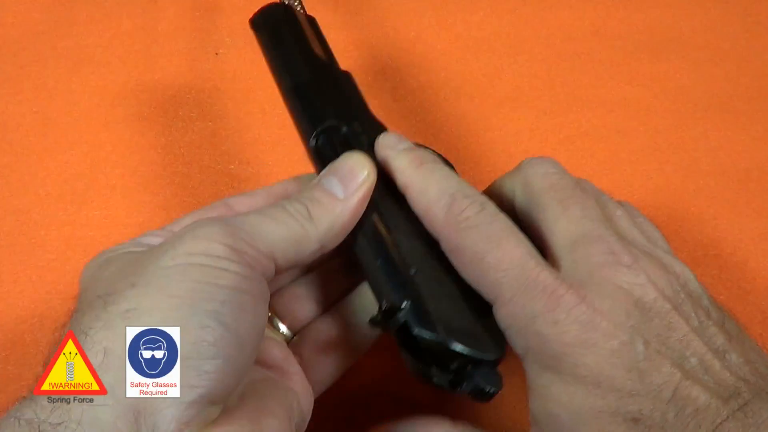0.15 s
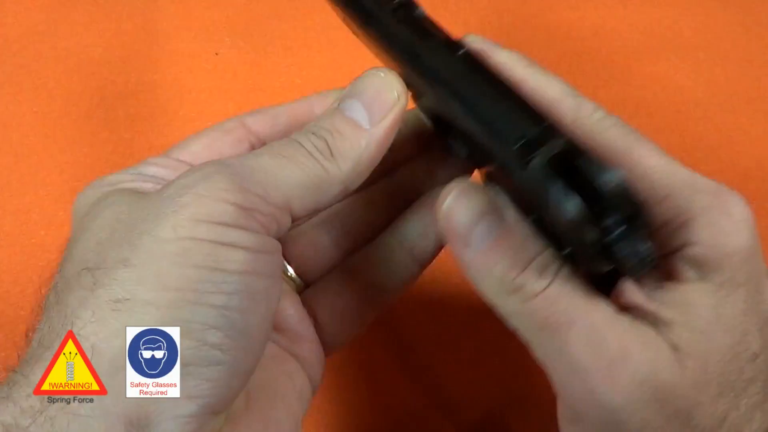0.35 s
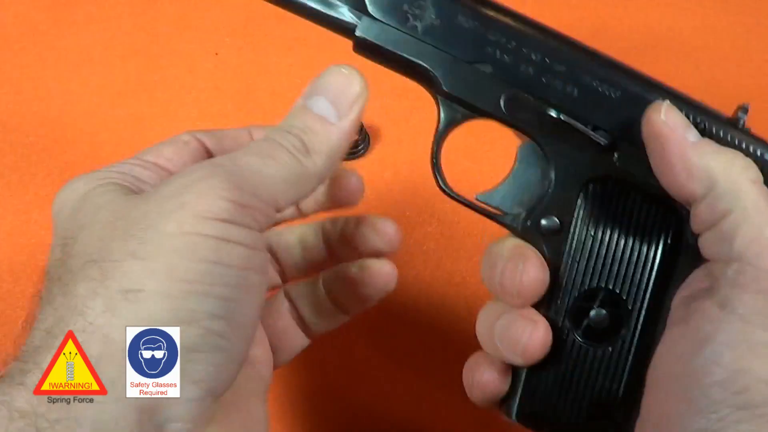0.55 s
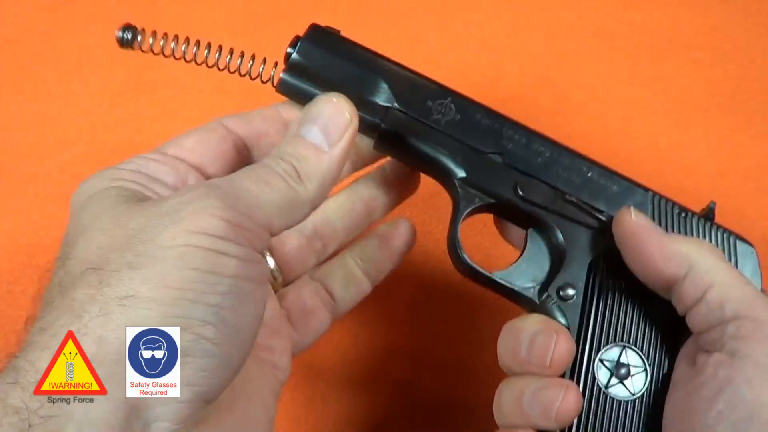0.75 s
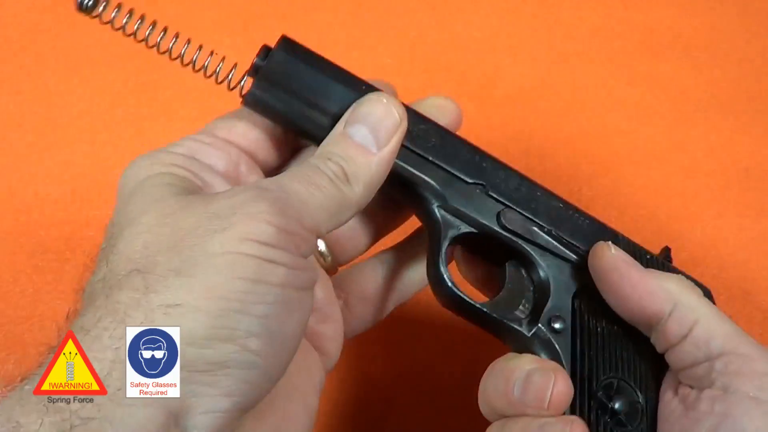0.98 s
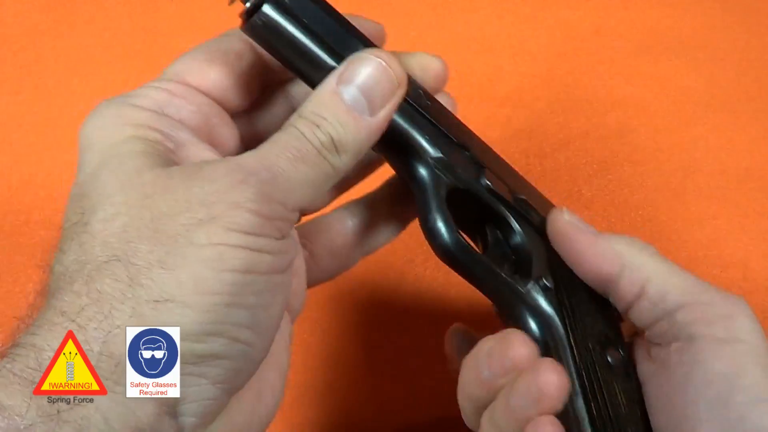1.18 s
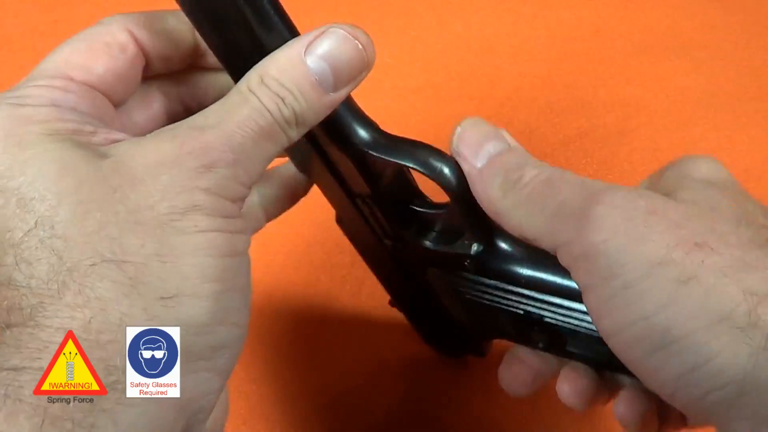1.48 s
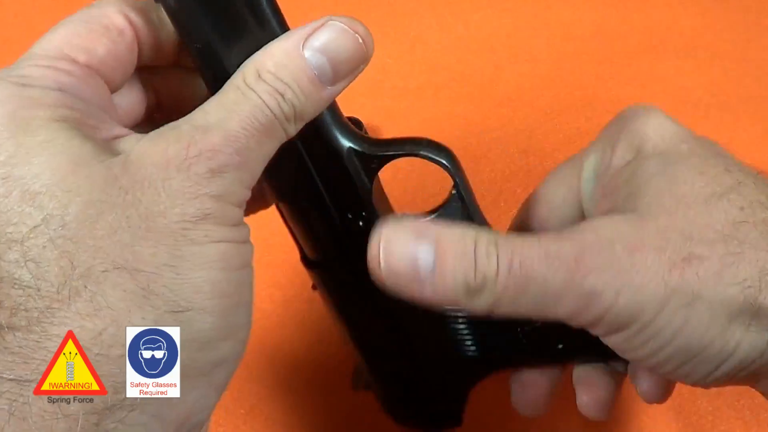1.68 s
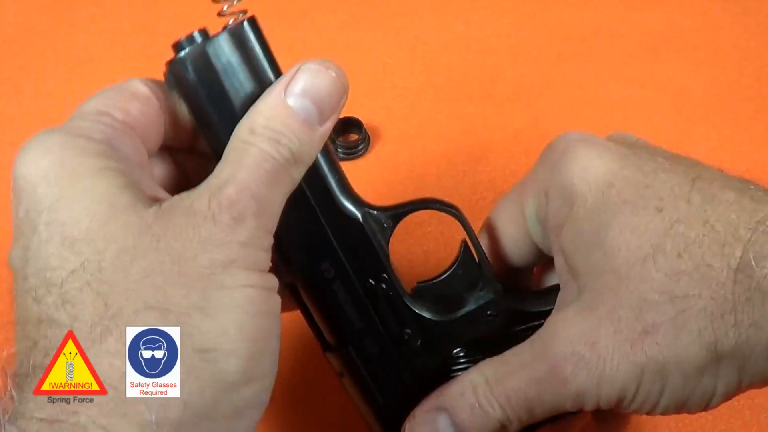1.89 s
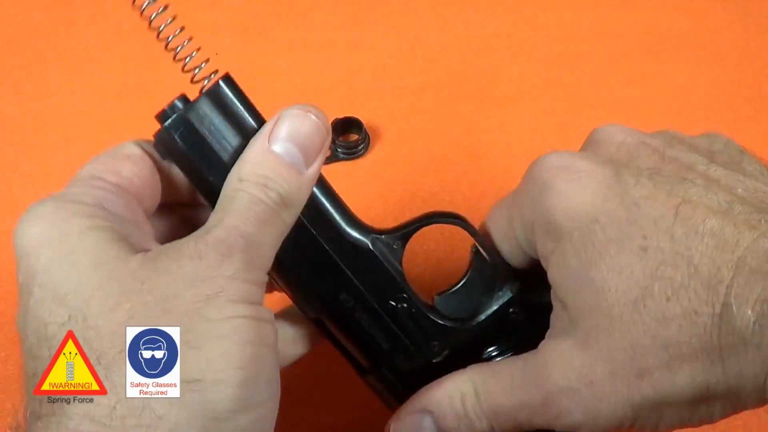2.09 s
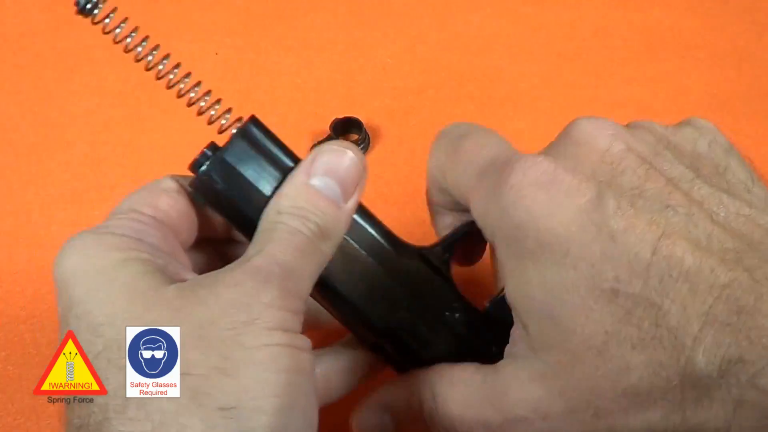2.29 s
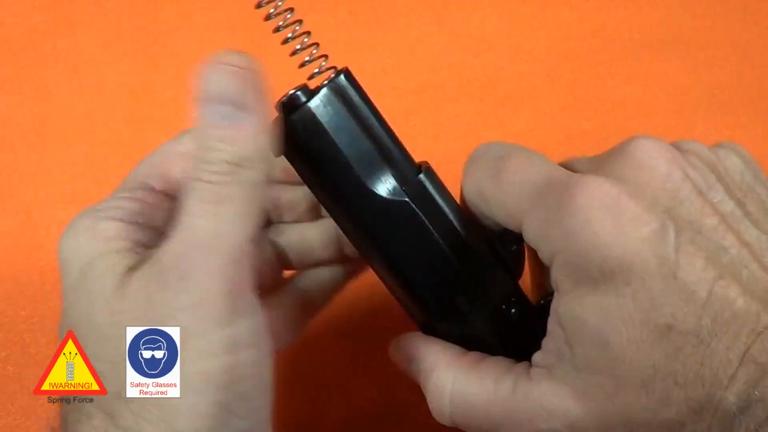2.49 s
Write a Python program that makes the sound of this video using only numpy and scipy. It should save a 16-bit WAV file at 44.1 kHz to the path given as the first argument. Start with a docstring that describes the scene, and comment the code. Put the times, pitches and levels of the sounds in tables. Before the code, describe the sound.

Loose steel pistol parts click, rattle and chatter brightly as hands turn them in a quiet room

```python
"""Hands turn a steel pistol with its slide and spring loose, just above a mat in a quiet room.
Low room hum, hiss, a thin high tone and faint ticking and scraping run all through; dull slips on
the mat come first, joined from 0.2 s by loose parts that knock and chatter, ringing the steel briefly.
More slips follow just before 1 s, and the rub on the mat swells at about 2 s, under the last knocks.
Knocks are rattles of impulses through decaying sines; rub, friction and air are filtered noise."""
import sys
import numpy as np
from scipy import signal
from scipy.fft import rfft, irfft
from scipy.io import wavfile

SR = 44100
rng = np.random.default_rng(int(sys.argv[2]) if len(sys.argv) > 2 else 0)


def gain_from_db(level_db):
    """Convert decibel levels to linear amplitude factors (20 dB per decade)."""
    decades = np.asarray(level_db, float) / 20
    return 10 ** decades


def dump_mix(stems):
    """Bounce the given channels to the path in sys.argv[1] as a 16-bit WAV at rate SR."""
    frames = np.atleast_2d(stems).T  # one column per channel
    limited = np.clip(frames, -1, 1)  # hard clip at full scale
    pcm = np.round(limited * 32767).astype(np.int16)
    wavfile.write(sys.argv[1], SR, pcm)


N = 116865  # length in samples

# Modes of slide and frame. Each row: frequency in Hz, relative level in dB, 60 dB decay time in s.
STEEL_MODES = [(1248, -10, 0.03), (1810, 2.5, 0.0081), (2292, 0, 0.022), (3430, -11.5, 0.027),
               (3724, -3, 0.014), (4304, -19, 0.036), (4848, -5.5, 0.016), (7300, 4.5, 0.018),
               (8688, 3.5, 0.032), (9800, 2, 0.021), (11130, 8.5, 0.0087), (12480, -29.5, 0.0053)]
SMALL_PARTS = 40  # modes of pins, spring and other small parts


def evened(x):
    """Scale to rms 1."""
    return x / np.sqrt(np.mean(x ** 2) + 1e-20)


def read(points, hz):
    """Read a spectrum on a log-frequency axis."""
    f, value = np.transpose(points)
    return np.interp(np.log(hz + 1), np.log(f + 1), value)


def level_over_time(points):
    """Read a curve of (s, dB) at every sample, in dB."""
    return np.interp(np.arange(N) / SR, *np.transpose(points))


def add(mix, s, sound):
    """Mix a sound in at time s."""
    part = mix[round(s * SR):][:len(sound)]
    part += sound[:len(part)]


def hiss(tone):
    """Steady noise of a given spectrum, rms 1."""
    gain = gain_from_db(read(tone, np.fft.rfftfreq(N, 1 / SR)))
    return evened(irfft(rfft(rng.standard_normal(N)) * gain, N))


def rattle_force(length_s, contacts):
    """One knock is a dense rattle of contacts that fades, then a few ragged late contacts."""
    chatter_per_s, chatter_rise, chatter_fade_db = 5500, 0.04, -7.5  # rise as a share of the length
    settle_per_s, settle_db, settle_t60_s = 670, -17.5, 0.06
    chance, push = contacts[0], 2 * contacts[1] - 1
    t = np.arange(contacts.shape[1]) / SR
    rise = 1 - np.exp(-(t + 1 / SR) / (chatter_rise * length_s))
    chatter = rise * gain_from_db(chatter_fade_db * (t / length_s) ** 2)
    settling = gain_from_db(settle_db - 60 * t / settle_t60_s)
    force = (chance < chatter_per_s / SR) * push * chatter
    force += (chance > 1 - settle_per_s / SR) * push * settling
    force[0] = 0.19  # the first touch
    return force


def ringing(struck_hz, length_s, draw):
    """Steel modes and many short modes of small parts, as decaying sines; returns (Hz, waveforms)."""
    mode_chance_db, detune = 5, 0.0019  # each knock lands elsewhere and the grip shifts the modes
    small_t60_s = 0.008
    struck_db, struck_t60_s, loose = 14.5, 0.0059, 1.34  # it rings longer in a long, loose rattle
    ring_on_db, ring_on_times = -21.5, 6.9  # faint ring-on, this many times longer
    # Rows of the steel modes that the grip hardly damps, counted from 0.
    ringers = [2, 6, 8]
    # Spectrum of the small parts. Each row: frequency in Hz, relative level in dB.
    small_tone = [(1300, 7), (2500, -2), (6000, -1.5), (9000, 5), (12000, 1.5), (15800, -9)]
    t, n = np.arange(4000) / SR, len(STEEL_MODES)
    steel_hz, steel_db, steel_t60 = np.transpose(STEEL_MODES)

    low_hz, high_hz = small_tone[0][0], small_tone[-1][0]
    small_hz = low_hz * (high_hz / low_hz) ** np.sqrt(draw[0, n:])  # crowded toward the treble
    hz = np.r_[steel_hz * (1 + detune * (2 * draw[0, :n] - 1)), small_hz]
    db = np.r_[steel_db, read(small_tone, small_hz)] + mode_chance_db * (2 * draw[1] - 1)
    t60 = np.r_[steel_t60, small_t60_s + 0 * small_hz]

    # the last small part is the one that rings most
    hz[-1] = struck_hz
    db[-1] = read(small_tone, struck_hz) + struck_db
    t60[-1] = struck_t60_s + loose * length_s

    fade_db = -60 * t / t60[:, None]
    fade = gain_from_db(fade_db)
    fade[ringers] += gain_from_db(ring_on_db + fade_db[ringers] / ring_on_times)
    phase = 2 * np.pi * (hz[:, None] * t + draw[2][:, None])
    return hz, gain_from_db(db[:, None]) * fade * np.sin(phase)


def knock(bands_db, length_s, struck_hz, draw, contacts):
    """A rattle of contacts excites the ringing parts; each of three bands gets its own level."""
    # Edges between the low, middle and high band, in Hz.
    edges_hz = [3000, 6000]
    hz, rings = ringing(struck_hz, length_s, draw)
    band = np.searchsorted(edges_hz, hz)
    ring_bands = [rings[band == k].sum(0) for k in range(3)]
    force = rattle_force(length_s, contacts)
    bands = signal.fftconvolve(ring_bands, force[None], axes=1)
    energy = (bands ** 2).sum(1) / (length_s * SR)
    return (gain_from_db(bands_db) / np.sqrt(energy)) @ bands


def knocks():
    """The loud knocks of steel on steel, one by one."""
    # Each row: start in seconds, level above 6 kHz in dB, rattle length in s, levels below 3 kHz and
    # from 3 to 6 kHz in dB relative to that, pitch in Hz of the part that rings most.
    knock_list = [(0.222, -37.5, 0.0026, -22, -1, 3870), (0.2316, -33.5, 0.0029, 1.5, 8, 3150),
                  (0.2446, -49.5, 0.0032, -3, 11, 3320), (0.2979, -26, 0.0036, -23, -4.5, 3730),
                  (0.312, -27.5, 0.0044, -8, -3.5, 6780), (0.343, -43.5, 0.0033, 12, 7, 2480),
                  (0.3596, -17.0, 0.0071, -15, -8.5, 8530), (0.428, -14.5, 0.0019, -42, -7, 5630),
                  (0.4406, -31, 0.0034, -6, -4, 2340), (0.5125, -25.5, 0.0046, -9.5, 1.5, 3010),
                  (0.5641, -51, 0.0025, 16, -1, 1240), (0.5748, -26, 0.0037, -13, -15, 9700),
                  (0.584, -36, 0.0025, -25, -20, 11130), (0.6277, -22.5, 0.0054, -7.5, -4, 8740),
                  (0.6502, -13.5, 0.0016, -34, -12, 9700), (0.658, -30, 0.0067, -23.0, -26, 8900),
                  (0.6832, -30, 0.003, -29, -23, 8450), (0.7026, -14, 0.0045, -11.5, -10.5, 8720),
                  (0.72, -29.5, 0.0081, -33, -0.5, 5860), (0.7606, -33.0, 0.0049, -3.5, -5, 1260),
                  (0.7934, -18.5, 0.0032, -22, -7, 8840), (0.8753, -28.5, 0.0048, -39, -50, 8650),
                  (0.8955, -27.5, 0.0029, -32, -39, 10250), (0.9318, -20.5, 0.0041, -32, -55, 8710),
                  (0.9497, -27, 0.0044, -17, 0, 4510), (1.0263, -19.0, 0.0097, -16, -4.5, 3634),
                  (1.0435, -25, 0.0034, 2, 0, 1880), (1.0483, -18.5, 0.0032, -5.5, -3.5, 2040),
                  (1.072, -32.5, 0.0085, -1.5, -7, 8600), (1.094, -27.5, 0.0054, -33, -20, 9900),
                  (1.104, -32, 0.0051, -25, -13, 9940), (1.15, -25.5, 0.013, -36, -54, 7300),
                  (1.164, -28, 0.0048, -39, -17, 11130), (1.174, -33.5, 0.0062, -27.5, 0, 4350),
                  (1.1975, -30.5, 0.0036, -5, -13, 2100), (1.2141, -33.5, 0.0019, 8, 9.5, 2420),
                  (1.2391, -30.5, 0.006, -23.0, -5, 7060), (1.27, -25, 0.0036, -38, -26, 11020),
                  (1.291, -28, 0.0016, -1, -3, 7360), (1.295, -20, 0.0028, -40, -18, 6830),
                  (1.3338, -15, 0.00072, -4, -2, 4720), (1.3387, -23.5, 0.0086, -20.5, -5, 10980),
                  (1.3453, -30, 0.002, -6, -3.5, 3580), (1.4082, -16, 0.0047, -21.5, -9.5, 9800.0),
                  (1.4227, -32, 0.011, -22, -10.5, 11150), (1.4425, -39, 0.012, 3, -8, 2287),
                  (1.4727, -30, 0.011, -18, -10, 8700), (1.4875, -29, 0.0036, -8, -13, 2160),
                  (1.5133, -21.5, 0.0034, -17.5, -3, 9500), (1.5304, -39.5, 0.0027, -24, 7, 3480),
                  (1.5352, -25, 0.0029, -16, -23, 9700), (1.5405, -21, 0.004, -15.5, -24, 12480),
                  (1.55, -14.5, 0.0049, -12, -9, 8800), (1.6038, -23, 0.0084, -22, -13, 7600),
                  (1.659, -52, 0.011, -4, 9.5, 3310), (1.6908, -35.5, 0.0067, -45, -13, 14700),
                  (1.7482, -34.5, 0.0044, -15, -14, 6040), (1.7642, -23, 0.0031, -22, -31, 13900),
                  (1.818, -29, 0.0026, -29, -7.5, 10800), (1.837, -23.5, 0.0047, -14, -10.5, 6100),
                  (1.8447, -24, 0.0057, -16.5, -41, 9100), (1.8959, -23.5, 0.0043, -28, -19.5, 7400),
                  (1.9086, -26, 0.0052, -40, -36, 9050), (1.9227, -16, 0.0023, -32, -12.5, 7860),
                  (1.9356, -41.5, 0.0057, 4.5, -14, 2590), (1.969, -20, 0.005, -26, -13, 8900),
                  (1.9793, -21, 0.0014, -24, -21, 8570.0), (1.9822, -26, 0.0094, -11, -12.5, 8740),
                  (2.0, -29.5, 0.0051, -21, -23, 8700), (2.0296, -23.5, 0.0019, -31, -24, 11020),
                  (2.0426, -27.5, 0.0034, -30, -20, 8900), (2.0698, -30.5, 0.0038, -35, -35, 8640),
                  (2.101, -24, 0.0032, -43, -39, 8330), (2.122, -29, 0.0027, -34, -23, 11000),
                  (2.15, -27.5, 0.0027, -12.5, -23, 1500), (2.1714, -27, 0.0031, -45, -39, 7650),
                  (2.2272, -24, 0.0032, -35, -33, 8940), (2.2475, -28, 0.0036, -36, -40, 8330),
                  (2.2848, -19, 0.0071, -38, -36, 8790), (2.3034, -17.5, 0.00098, -18, -11, 7420),
                  (2.365, -21, 0.001, -14.5, -12, 8350), (2.3692, -23.5, 0.0099, -49, -26, 8670),
                  (2.3794, -27.5, 0.0026, -15.5, -4.5, 8150), (2.4072, -36.5, 0.0093, -16, -21, 8860),
                  (2.4533, -36.5, 0.0022, -6, 3, 3700), (2.474, -28, 0.00057, -5, 3.5, 3870),
                  (2.5429, -53.5, 0.011, 6.5, -19, 1730), (2.5847, -36.5, 0.0042, -16, -11.5, 10200),
                  (2.623, -30, 0.0024, -24, -22, 10700)]
    out = np.zeros(N)
    draws = rng.random((len(knock_list), 3, len(STEEL_MODES) + SMALL_PARTS))
    contacts = rng.random((len(knock_list), 2, 1500))
    for (s, db, length_s, low, mid, hz), draw, contact in zip(knock_list, draws, contacts):
        bands_db = db + np.array([low, mid, 0])
        add(out, s, knock(bands_db, max(length_s, 1e-4), hz, draw, contact))
    return out


def ticks():
    """A scrape of many tiny contacts of uneven size over smooth friction, following the handling."""
    ticks_per_s, spread_db, tick_s, kinds = 4500, 6.5, 0.0023, 24
    friction_db = -1.5  # against the ticks
    # Faint handling of the parts. Each row: time in seconds, level in dB.
    handling = [(0, -54.5), (.2, -58.5), (.35, -49), (.385, -38.5), (.45, -39), (.61, -54), (.73, -45),
                (1.0, -51), (1.06, -46.5), (1.4, -44.5), (1.58, -48.5), (1.73, -51), (1.83, -47.5),
                (2.0, -49.5), (2.2, -53), (2.65, -53)]
    # Relative levels of a tick below 3 kHz, from 3 to 6 kHz and above, in dB.
    tick_bands_db = [-20.5, -4, 3.5]
    # Spectrum of the smooth friction. Each row: frequency in Hz, relative level in dB.
    friction_tone = [(700, -15), (2000, 0), (6000, -4.5), (9000, -4), (15800, -2)]
    happens = rng.random(N) < ticks_per_s / SR
    size = gain_from_db(spread_db * np.minimum(rng.exponential(1, N), 5)) * happens
    kind = rng.integers(0, kinds, N)
    draws = rng.random((kinds, 3, len(STEEL_MODES) + SMALL_PARTS))
    contacts = rng.random((kinds, 2, 90))
    out = np.zeros(N)
    for k in range(kinds):
        struck_hz = STEEL_MODES[k % len(STEEL_MODES)][0]
        tick = knock(tick_bands_db, tick_s, struck_hz, draws[k], contacts[k])
        out += signal.oaconvolve(size * (kind == k), tick)[:N]
    scrape = evened(out) + gain_from_db(friction_db) * hiss(friction_tone)
    return scrape * gain_from_db(level_over_time(handling))


def mat():
    """Dull slips, each a short decaying tone with one overtone, and a soft noise rub on the mat."""
    t60_s, rise_s, overtone = 0.031, 0.003, 0.2
    # Slips and bumps. Each row: start in seconds, relative level in dB, pitch in Hz.
    slips = [(0.155, -42, 262), (0.179, -38, 252), (0.216, -45, 243), (0.266, -36, 235),
             (0.286, -36.5, 250), (0.346, -39.5, 240), (0.4, -40.5, 236), (0.946, -38, 327),
             (0.9462, -39, 550), (0.972, -41, 330)]
    # Rub of skin and sleeve. Each row: time in seconds, level in dB.
    rub = [(0, -64), (1.901, -75.5), (2.03, -50.5), (2.2, -61.5)]
    # Spectrum of the rub. Each row: frequency in Hz, relative level in dB.
    rub_tone = [(200, -8), (500, 2.5), (920, 0), (1300, -17)]
    t, out = np.arange(3000) / SR, np.zeros(N)
    for s, db, hz in slips:
        shape = gain_from_db(db - 60 * t / t60_s) * (1 - np.exp(-t / rise_s))
        thump = np.sin(2 * np.pi * hz * t) + overtone * np.sin(2 * np.pi * 1.7 * hz * t)
        add(out, s, 2 * shape * thump)
    return out + hiss(rub_tone) * gain_from_db(level_over_time(rub))


def room(x):
    """Sparse taps of random sign, each band dying at its own speed, partly alike in both channels."""
    same = 0.66  # share of the taps common to both channels
    # Decay of the room. Each row: frequency in Hz, 60 dB decay time in s.
    room_t60 = [(1000, 0.21), (6000, 0.22), (16000, 0.045)]
    taps = np.zeros((3, SR // 2))
    at = np.arange(200, SR // 2 - 20, 20)
    at = at + rng.integers(0, 20, (3, len(at)))
    np.put_along_axis(taps, at, rng.choice([-1., 1.], at.shape), 1)
    pair = same * taps[2] + np.sqrt(1 - same ** 2) * taps[:2]
    hz, t, z = signal.stft(pair, SR, nperseg=128)
    fade = gain_from_db(-60 * t / read(room_t60, hz)[:, None])
    tail = signal.istft(z * fade, SR, nperseg=128)[1]
    return signal.fftconvolve(x[None], tail / np.linalg.norm(tail[0]), axes=1)[:, :N]


def air():
    """Room hum and hiss as noise, shared and opposed between the microphones, and a thin sine."""
    shared_db, opposed_db = -53, -55  # rms
    whine_hz, whine_db = 15734, -66.0  # a thin electronic tone, rms
    # Noise alike at both microphones. Each row: frequency in Hz, relative density in dB per Hz.
    shared_tone = [(20, -9.5), (70, -4), (167, 1), (400, -4.5), (750, -11), (1500, -10), (4000, -15),
                   (10000, -51), (15800, -15.5)]
    # Noise opposed between them. Each row: frequency in Hz, relative density in dB per Hz.
    opposed_tone = [(20, -28), (187, -8), (400, -4), (1000, -6.5), (2500, -14.5), (5000, -16.5),
                    (11000, -27), (16000, -53)]
    whine = gain_from_db(whine_db) * np.sqrt(2) * np.sin(2 * np.pi * whine_hz * np.arange(N) / SR)
    mid = gain_from_db(shared_db) * hiss(shared_tone) + whine
    return mid + gain_from_db(opposed_db) * np.outer([1, -1], hiss(opposed_tone))


def scene():
    """Steel placed left to right, with its room, over mat and air."""
    steel_cut_hz, room_db = 826, -12.5  # small parts radiate no bass
    # Place of the steel. Each row: time in seconds, left minus right in dB.
    place = [(1.55, 0.2), (2.2, 2), (2.65, -1.2)]
    highpass = signal.butter(4, steel_cut_hz, "high", fs=SR, output="sos")
    steel = signal.sosfilt(highpass, knocks() + ticks())
    half_db = level_over_time(place) / 2
    direct = steel * gain_from_db(np.array([half_db, -half_db]))
    return direct + gain_from_db(room_db) * room(steel) + mat() + air()


def band_limit(x):
    """A steep low-pass at the top of the band."""
    return signal.sosfilt(signal.butter(12, 16980, fs=SR, output="sos"), x)


def record(dry):
    """Limit the treble with a steep low-pass and finish the mix."""
    edge_hz = 15880
    lowpass = signal.firwin(511, edge_hz, window=("kaiser", 9), fs=SR)
    mix = signal.oaconvolve(dry, lowpass[None], "same")
    return band_limit(mix)


dry = scene()
out = record(dry)
dump_mix(out)
```